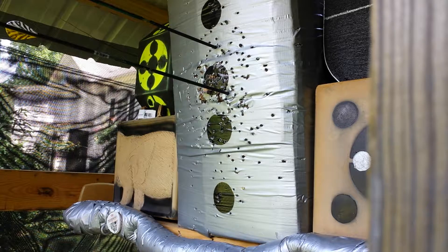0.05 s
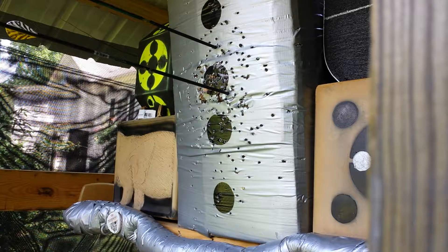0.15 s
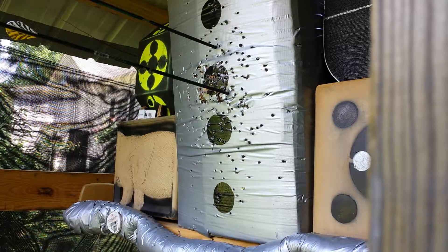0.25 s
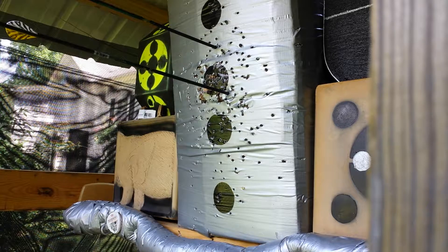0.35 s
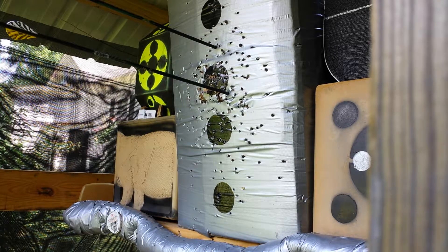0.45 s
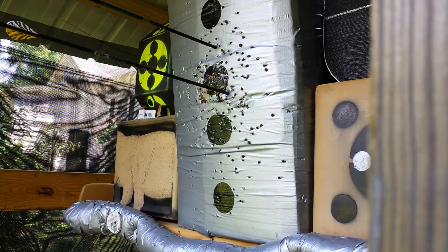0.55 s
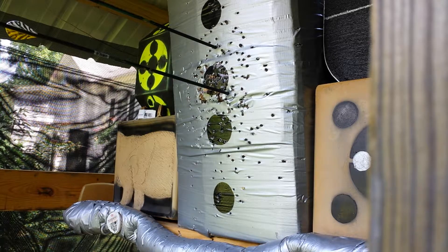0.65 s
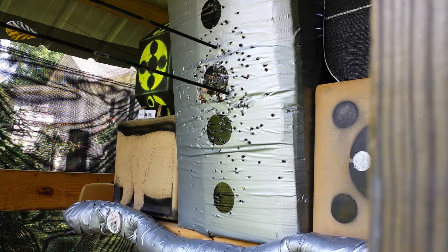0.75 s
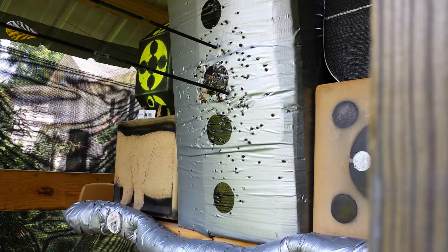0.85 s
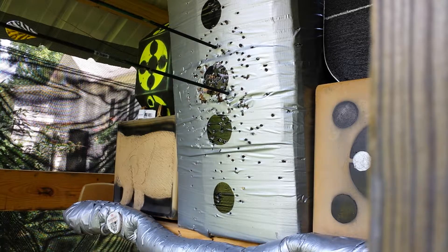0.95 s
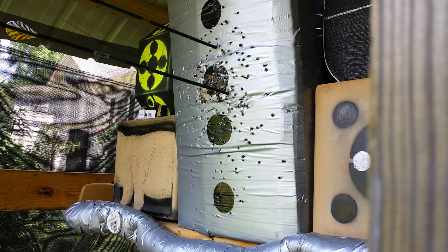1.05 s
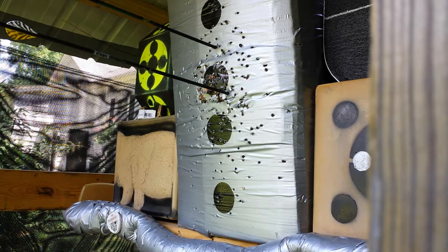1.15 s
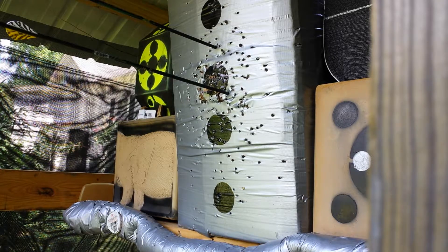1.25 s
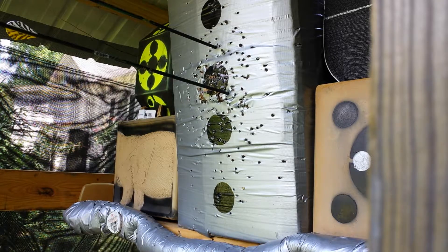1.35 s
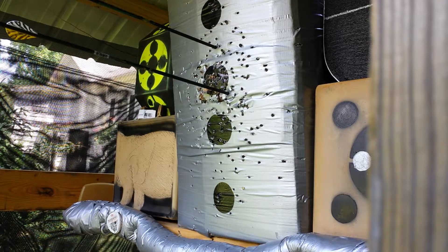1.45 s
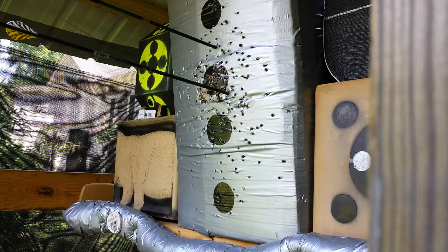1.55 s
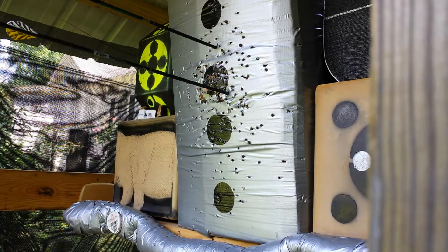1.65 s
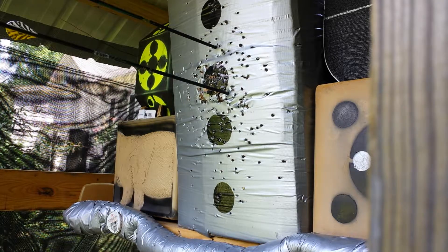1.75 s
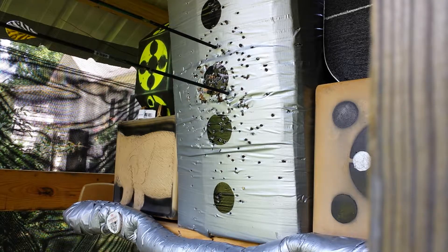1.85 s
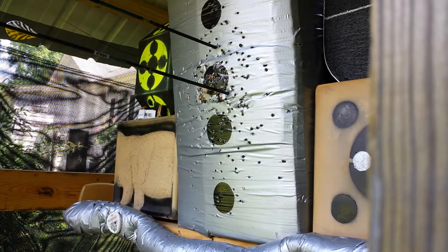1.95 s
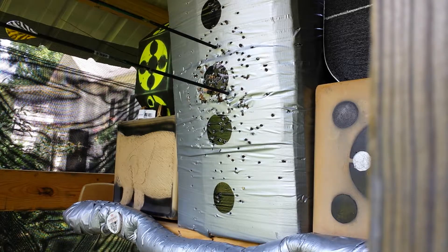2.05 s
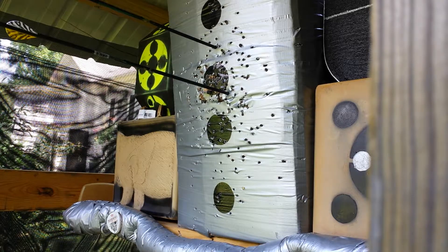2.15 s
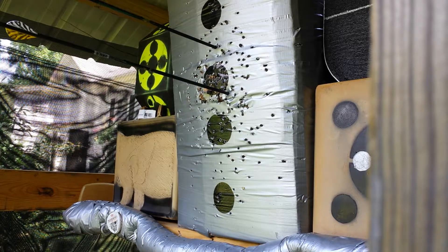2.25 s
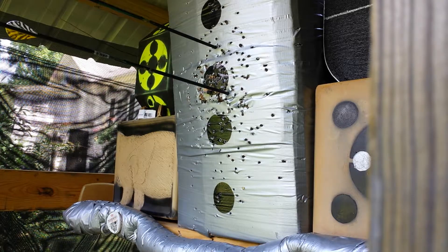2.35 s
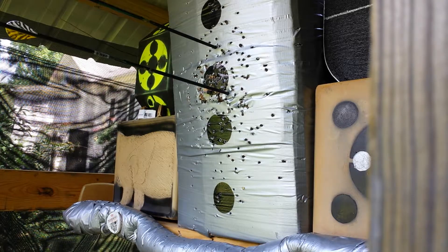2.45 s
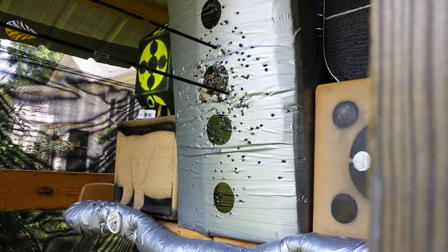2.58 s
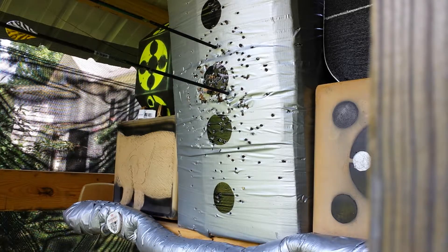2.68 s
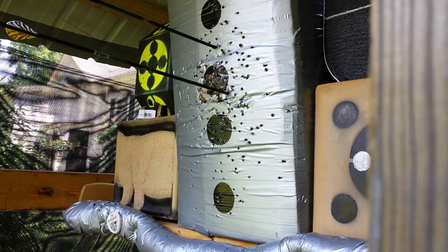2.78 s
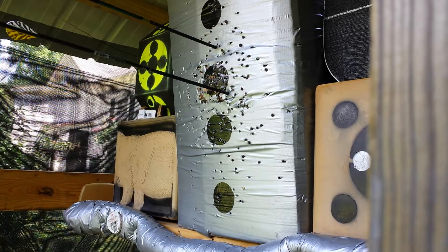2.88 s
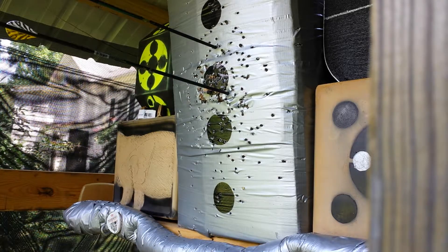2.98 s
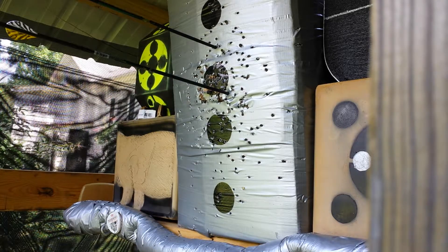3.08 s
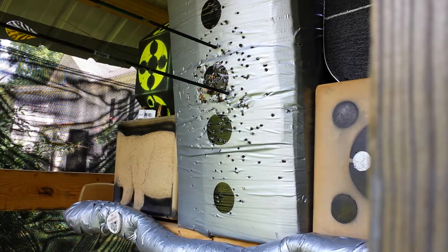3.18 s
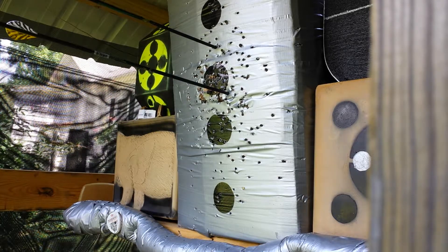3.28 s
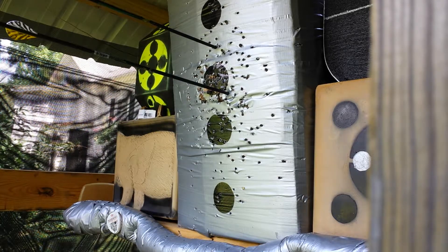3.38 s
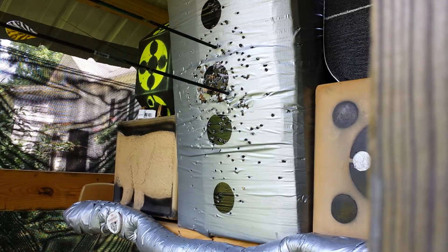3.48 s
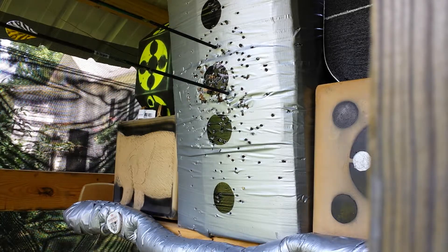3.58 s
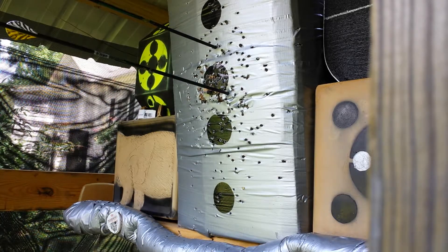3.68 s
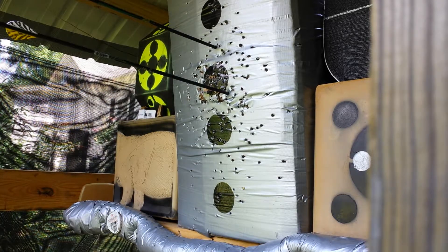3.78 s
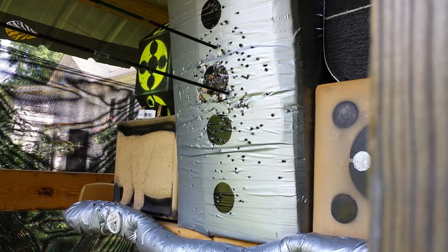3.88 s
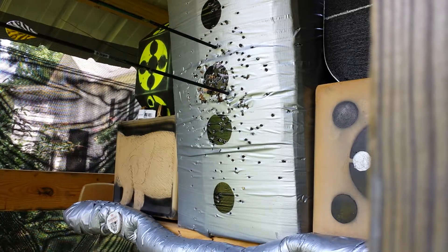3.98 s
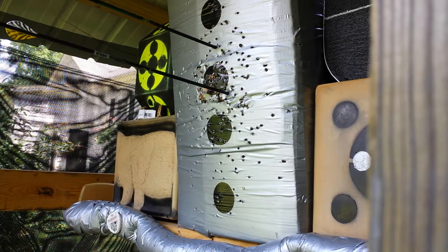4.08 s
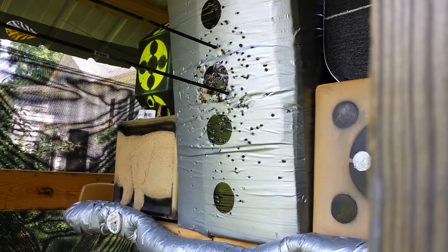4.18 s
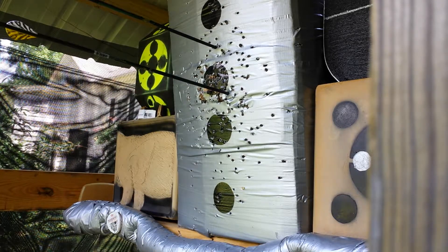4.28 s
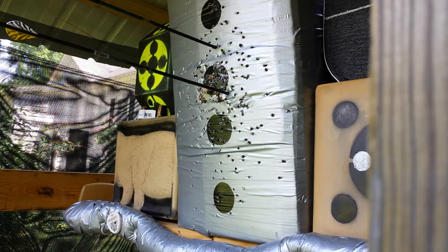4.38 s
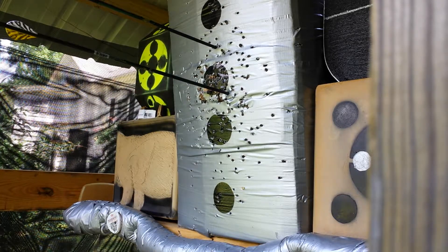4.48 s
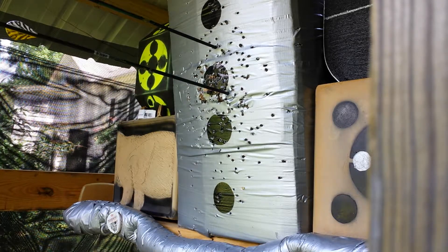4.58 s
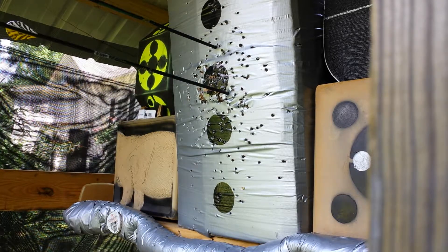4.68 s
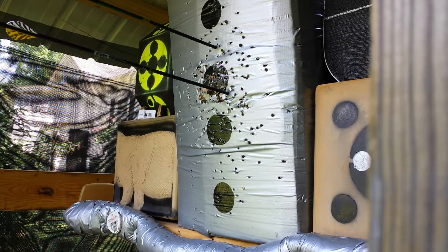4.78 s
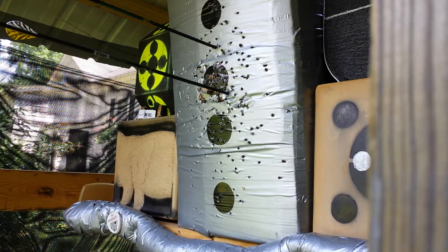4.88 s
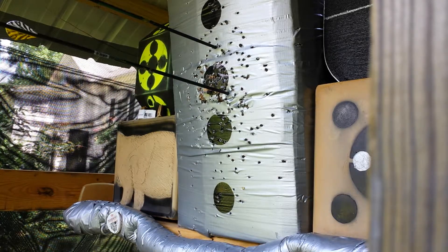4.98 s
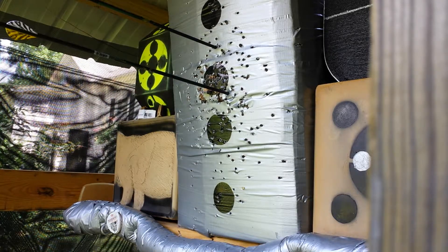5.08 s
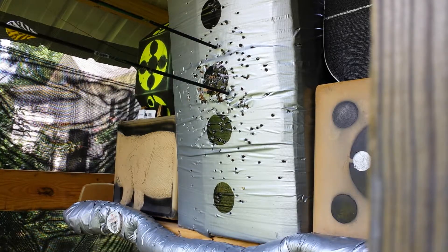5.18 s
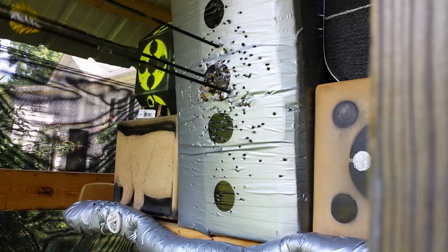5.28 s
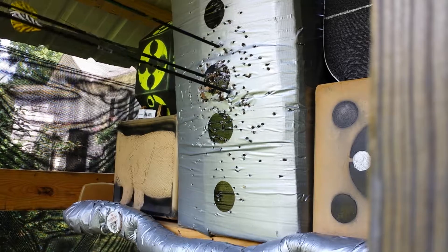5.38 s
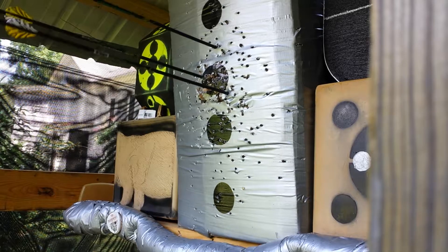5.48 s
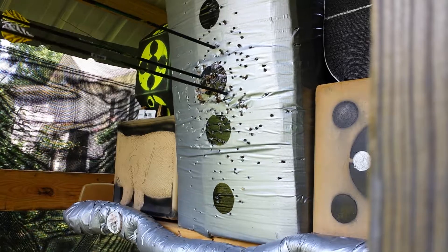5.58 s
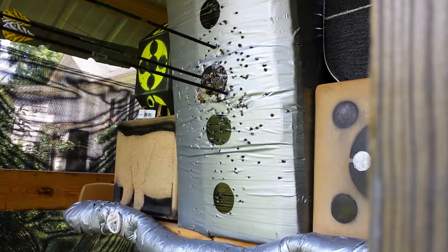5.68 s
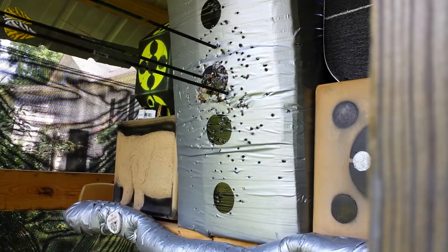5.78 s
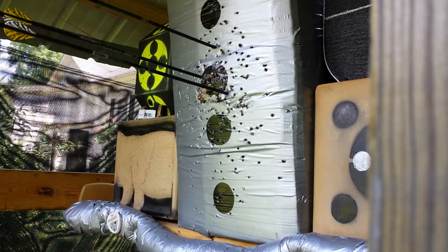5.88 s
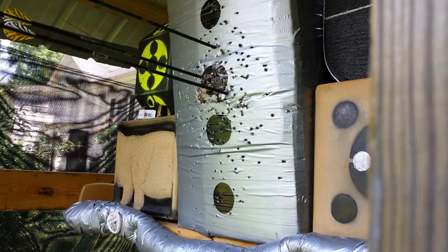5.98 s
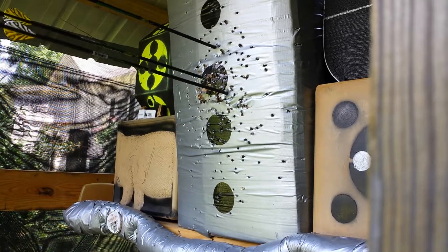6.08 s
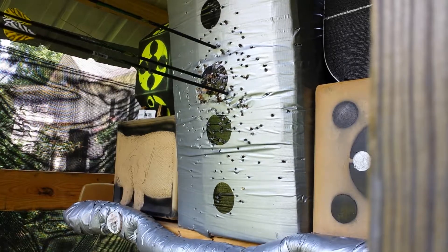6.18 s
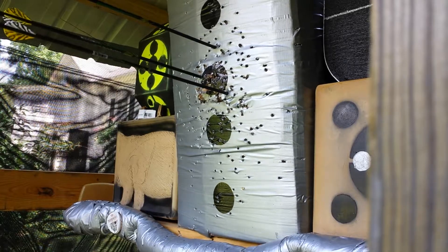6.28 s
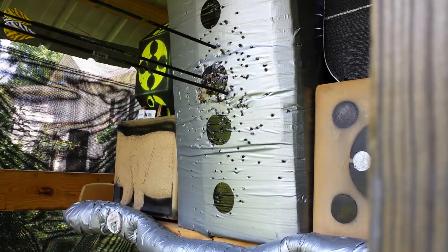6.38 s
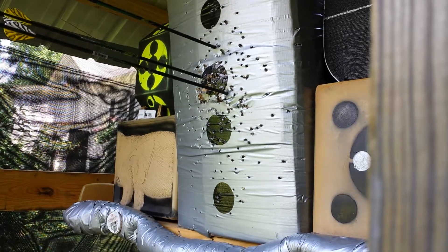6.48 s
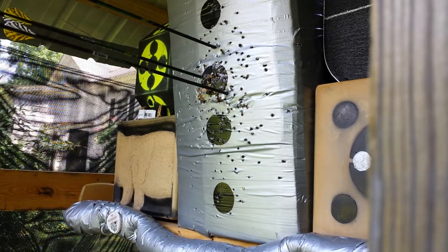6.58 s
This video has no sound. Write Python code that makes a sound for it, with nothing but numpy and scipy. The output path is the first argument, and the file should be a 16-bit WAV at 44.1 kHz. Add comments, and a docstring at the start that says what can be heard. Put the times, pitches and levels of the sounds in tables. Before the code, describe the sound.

After nearly five seconds of leafy insect hiss, a faint bow release is followed by a loud arrow smack, low thud and short echoes.

```python
"""Woods: insect and leaf hiss from the left, gusting rumble and a few gliding bird whistles run behind.
After a light tick a far bow snaps (coloured noise bursts, damped modes); the vanes' noise hisses closer.
The point smacks into a foam block (noise cracks), which thuds (damped sines); close reflections colour it.
Roof ring, trees and boom answer in decaying noise, then a dull thud echo, a far knock and two more ticks.
The camera's gain control ducks everything after the smack, then recovers."""
import sys
import numpy as np
from scipy import signal
from scipy.fft import rfft, irfft, next_fast_len
from scipy.io import wavfile
from scipy.ndimage import minimum_filter1d

SR = 44100
rng = np.random.default_rng(int(sys.argv[2]) if len(sys.argv) > 2 else 0)


def unload_audio(sound):
    """Save the sound as a 16-bit wav file, at the path given as the first command line argument."""
    columns = np.transpose(np.atleast_2d(sound))
    # keep every value between -1 and 1, then stretch to whole-number steps
    steps = np.round(np.clip(columns, -1, 1) * 32767)
    wavfile.write(sys.argv[1], SR, steps.astype(np.int16))


N = 292824
T = np.arange(N) / SR  # scene time [s]
AGE = T[:round(1.25 * SR)]  # time since an event's start [s]
RELEASE_S, HIT_S = 4.8005, 5.2848


def amp(db):
    """Decibels to gain."""
    return 10 ** (np.asarray(db) / 20)


def unit(x):
    """Scales to an rms of one."""
    return x / np.sqrt(np.mean(x ** 2) + 1e-20)


def read(points, hz):
    """Interpolates a table along a log-frequency axis."""
    f, value = np.transpose(points)
    return np.interp(np.log(hz + 1), np.log(f + 1), value)


def pan(side_db):
    """Port gains for a source louder on the left by side_db."""
    return amp(np.array([[.5], [-.5]]) * side_db)


def add(mix, s, sound):
    """Mixes a sound in at time s, in place."""
    part = mix[:, round(s * SR):][:, :sound.shape[-1]]
    part += sound[..., :part.shape[1]]


def low_cut(x, edge_hz):
    """High-pass: keeps deep bass out of a sound."""
    return signal.sosfilt(signal.butter(2, edge_hz, "high", fs=SR, output="sos"), x)


def low_pass(edge_hz):
    """Second-order low-pass sections."""
    return signal.butter(2, edge_hz, fs=SR, output="sos")


def dying(t60_s, rise_s, delay_s=0.):
    """Envelope of a blow: quick rise, exponential fall."""
    age = np.maximum(AGE - delay_s, 0)
    return (1 - np.exp(-age / rise_s)) * np.exp(-np.log(1000) * age / t60_s)


def noise(colour, same=0., lag_ms=0., size=len(AGE)):
    """Unit-rms coloured noise at two microphone ports; the shared part lags by lag_ms on the left."""
    full = next_fast_len(size)
    hz = np.fft.rfftfreq(full, 1 / SR)
    own, shared = rfft(rng.standard_normal((2, full)))
    same = np.clip(read(same, hz) if np.ndim(same) else same, -1, 1)
    lag = np.exp(-2j * np.pi * hz * lag_ms / 1000)
    left = same * shared * lag + np.sqrt(1 - same ** 2) * own
    ports_db = [read(np.array(colour)[:, [0, port]], hz) for port in (1, 2)]
    return unit(irfft(np.array([left, shared]) * amp(ports_db), full)[:, :size])


def drift(top_hz):
    """Slow random wander of unit rms: sines of random phase up to top_hz."""
    coarse = T[::256]
    rates_hz = np.geomspace(top_hz / 20, top_hz, 20)
    slow = sum(np.sin(2 * np.pi * (f * coarse + rng.random())) / np.sqrt(f) for f in rates_hz)
    return np.interp(T, coarse, unit(slow))


def ring(modes, rise_s):
    """Damped sines; each port hears them in a different random phase."""
    out = np.zeros((2, len(AGE)))
    for hz, db, t60_s in modes:
        phase = rng.random((2, 1))
        out += amp(db) * dying(t60_s, rise_s) * np.sin(2 * np.pi * (hz * AGE + phase))
    return out


def rock(modes, rise_s, delay_s):
    """Damped modes that all start from rest."""
    age = AGE - delay_s
    return sum(amp(db) * dying(t60_s, rise_s, delay_s) * np.sin(2 * np.pi * hz * age)
               for hz, db, t60_s in modes)


# colour of the bursting cover: (frequency [Hz], left [relative dB/Hz], right [relative dB/Hz])
SMACK_COLOUR = [(400, -8.5, -10.5), (600, -6.5, -4.5), (850, -9.5, -7.5), (1294, -10, -16),
                (2030, -9, -14.5), (2660, -0.5, 1), (3500, -3.5, -8), (4300, -6, -7), (5400, -3, -5),
                (7700, -11, -7.5), (9000, -25.5, -16), (12500, -28, -22.5), (15000, -26.5, -15.5)]
# first crack and its returns off close surfaces: (delay [s], level [dB], left lag [ms])
SLAPS = [(0, -5.5, .16), (.0022, -5.5, .05), (.0036, -3.5, 0.17), (.006, -11.5, .1), (.0175, -22.5, -.1)]


def smack(crack_db=11.0, crack_t60_s=0.016, crush_db=1, crush_t60_s=0.055):
    """The point bursts the cover, close surfaces repeat the crack, the foam grips the arrow."""
    cracks = sum(amp(db) * noise(SMACK_COLOUR, .9, lag_ms) * dying(crack_t60_s, .00008, delay_s)
                 for delay_s, db, lag_ms in SLAPS)
    crush = noise(SMACK_COLOUR, 0.43, 0.18) * dying(crush_t60_s, 0.0025)
    return low_cut(amp(crack_db) * cracks + amp(crush_db) * crush, edge_hz=440)


# taut face of the block: (frequency [Hz], level [relative dB], t60 [s])
FACE_MODES = [(232, -1.5, 0.045), (615, -5, .04), (988, -7.5, 0.04), (1105, -10, .04)]
# block and stand: (frequency [Hz], level [relative dB], t60 [s])
BLOCK_MODES = [(80, -15.5, .16), (109.7, -9.5, .13), (130.3, -0.5, 0.11), (145.8, -13, 0.14),
               (179.2, -11, 0.12), (210, -13, 0.11), (260, -13, 0.063), (331, -7.5, 0.092),
               (472, -15.5, 0.092), (584, -15.5, .07), (625, -12, 0.063), (767, -19.5, .07),
               (948, -14.5, .06)]


def block(thud_db=3.5, push_s=.0037, rise_s=0.0025, face_db=-1, face_rise_s=.0015, face_s=.0005,
          lowest_hz=52):
    """The face knocks first; the braking arrow then shoves the heavy block, which rocks in low modes."""
    knock = amp(face_db) * rock(FACE_MODES, face_rise_s, face_s)
    thud = amp(thud_db) * rock(BLOCK_MODES, rise_s, push_s)
    return pan(2.2) * low_cut(knock + thud, lowest_hz)


# bright lines in the roof's reflections: (frequency [Hz], level [relative dB], t60 [s])
REFLECTION_LINES = [(2430, -2, 0.11), (2620, -1.5, 0.081), (2790, -4, .07), (3280, 3, .06),
                    (3770, -6, 0.091), (4911, -4, 0.066), (5130, 2.5, .06), (5280, 4, 0.1),
                    (5800, 1.5, .08), (5930, 6, 0.066)]


def reflection_lines(lines_db=-11):
    """Close reflections add short bright tones to the hit, made as damped sines."""
    return amp(lines_db) * pan(3) * ring(REFLECTION_LINES, .0005)


# colours of roof ring, tree echo, rolling thud:
# (frequency [Hz], left [relative dB/Hz], right [relative dB/Hz])
ROOF_COLOUR = [(600, -4.5, -8.5), (1000, -11.5, -10.5), (1586, -11, -15), (2400, -3, -2),
               (3400, -1.5, -4.5), (4300, -5, -7), (5600, -0.5, -6.5), (7440, -10.5, -7.5),
               (9100, -16.5, -18.5), (12520, -26, -17), (15000, -25, -15.5)]
TREES_COLOUR = [(300, 2, -1), (600, -6, -7), (1200, -9.0, -16), (2500, -5.5, -7.5), (4000, -6, -14),
                (5600, -3.5, -12.5), (8500, -18, -16.5), (11500, -27.5, -25), (15000, -28.5, -25)]
BOOM_COLOUR = [(30, -30, -31.5), (80, -7, -11), (125, 0, -3), (170, -6.5, -9), (260, -18.5, -22.5),
               (700, -30.5, -33.5), (3000, -69.5, -69.5)]


def echoes(roof_db=-1.5, roof_t60_s=0.12, trees_db=-27.5, trees_t60_s=0.92, boom_db=-30.0,
           boom_t60_s=1.05, clump_db=1):
    """Dense short ring under the roof, faint long one from trees and ground, and a rolling boom."""
    same = [(150, 1.0), (600, .8), (1500, .1)]  # (frequency [Hz], port likeness [0-1])
    clumps = amp(clump_db * drift(140)[:len(AGE)])  # reflections arrive in bunches
    roof = low_cut(noise(ROOF_COLOUR, same), edge_hz=280) * dying(roof_t60_s, .004) * clumps
    trees = noise(TREES_COLOUR, same) * dying(trees_t60_s, .02) * np.sqrt(clumps)
    boom = noise(BOOM_COLOUR, same) * dying(boom_t60_s, .05)
    return amp(roof_db) * roof + amp(trees_db) * trees + amp(boom_db) * boom


def thud_echo(thud, echo_db=-27, dull_hz=350):
    """The low thud comes back once, low-passed, from something nearby."""
    return amp(echo_db) * signal.sosfilt(low_pass(dull_hz), thud)


# dull far echo: (frequency [Hz], left [relative dB/Hz], right [relative dB/Hz])
FAR_WALL_COLOUR = [(100, -8, -10), (400, -4, -9), (1140, 5, -3), (1800, -19, -18), (5000, -22, -28),
                   (15000, -41, -45)]
# ringing of the far knock: (frequency [Hz], level [relative dB], t60 [s])
FAR_RING_MODES = [(745, 2, 0.43), (1125, 5, 0.22), (1390, -2, .12)]


def far_knock(wall_db=-37, t60_s=0.23, ring_db=-43):
    """The smack returns dull, through the trees, from something large and far: noise plus a few modes."""
    wall = amp(wall_db) * noise(FAR_WALL_COLOUR, 0.67) * dying(t60_s, 0.00093)
    return wall + amp(ring_db) * ring(FAR_RING_MODES, 0.0018)


# string and limbs: (frequency [Hz], left [relative dB/Hz], right [relative dB/Hz])
BOW_COLOUR = [(120, -11, -18), (280, -6, -4), (516, -11, -20), (1100, -1.5, -9), (1750, -5, -8),
              (2300, -4.5, -14), (4000, -3.5, -12), (5800, -10, -10.0), (8500, -29, -12), (13000, -38, -23),
              (15000, -42.5, -25)]
# limbs and cams: (frequency [Hz], level [relative dB], t60 [s])
LIMB_MODES = [(225, -2.5, .25), (1780, 0, .22), (2340, -2, .2)]


def bow(string_db=-44, lead_s=.007, snap_db=-21, buzz_db=-34, buzz_t60_s=.22, limbs_db=-47,
        bounce_db=-33, bounce_s=0.0073, bounce_t60_s=0.046):
    """The string starts forward, snaps taut, and the limbs buzz out; the ground repeats the snap."""
    string = amp(string_db) * noise(BOW_COLOUR, 0.56, 0.4) * dying(0.049, 0.00041)
    envelope = amp(snap_db) * dying(0.0086, 0.00061) + amp(buzz_db) * dying(buzz_t60_s, 0.004)
    snap = noise(BOW_COLOUR, 0.85, .36) * envelope
    bounce = amp(bounce_db) * noise(BOW_COLOUR, .75, .1) * dying(bounce_t60_s, .001, bounce_s)
    limbs = amp(limbs_db) * pan(4.4) * ring(LIMB_MODES, .002)
    out = np.zeros((2, N))
    add(out, RELEASE_S - lead_s, string)
    add(out, RELEASE_S, snap + bounce + limbs)
    return out


# arrow leaving the bow, vanes close by: (frequency [Hz], left [relative dB/Hz], right [relative dB/Hz])
LAUNCH_COLOUR = [(400, -10.5, -11.5), (1200, -7.5, -18), (1795, -6, -10), (2600, -8.5, -16),
                 (4000, -3, -15.5), (5300, 2, -11), (6990, -13, -14.5), (10010, -23.5, -19.5),
                 (15000, -29.5, -30)]
VANES_COLOUR = [(400.6, -20.5, -23.5), (1100, -15.5, -22), (2000, -7, -13.5), (3000, -4, -11.5),
                (4100, -4.5, -10), (5300, 1, -10.5), (6750, -9, -10), (9500, -20, -13.5),
                (15040, -32.5, -15)]


def flight(launch_db=-44, launch_t60_s=1.7, near_db=-38, pass_s=5.255, near_s=0.026, arrive_db=-33,
           arrive_s=.005):
    """The vanes hiss off the bow, swell as one over distance, and flare as they enter the shelter."""
    t = RELEASE_S + AGE
    leaving = amp(launch_db) * dying(launch_t60_s, 0.016)
    flown = (t - RELEASE_S) / (HIT_S - RELEASE_S)
    passing = amp(near_db) * flown / np.hypot(1, (t - pass_s) / near_s)
    arriving = amp(arrive_db) * np.exp(-abs(t - HIT_S) / arrive_s)
    vanes = noise(VANES_COLOUR, 0.36, .3) * (passing + arriving) * (t < HIT_S)
    return noise(LAUNCH_COLOUR, 0.55, -0.35) * leaving + vanes


def tick(db, centre_hz, width_octaves, t60_s=0.017, room_db=-21):
    """A steep, damped noise burst in one bell-shaped band, with a little of the roof behind it."""
    hz = np.geomspace(100, 16000, 60)
    bell_db = -40 * np.log10(1 + (np.log2(hz / centre_hz) / width_octaves) ** 2)
    envelope = dying(t60_s, 0.00034) + amp(room_db) * dying(0.17, .003)
    return amp(db) * pan(5.0) * noise(np.c_[hz, bell_db, bell_db], 0.94, 0.35) * envelope


# far notes: (time [s], length [s], pitch before arch [Hz], glide [octaves], level [dB])
BIRD_NOTES = [(1.138, .042, 2750, -.3, -51), (1.178, .05, 3165, .06, -51.5), (1.255, .065, 2900, .04, -59),
              (1.325, .04, 3700, -.08, -60), (2.98, .055, 2910, -.3, -54), (3.07, .04, 2220, -.06, -59.5),
              (3.145, .055, 3030, .2, -55.5), (4.58, .055, 2780, 0, -58.5), (4.691, .06, 2906, .17, -56.5),
              (6.088, .026, 2740, -.14, -52), (6.118, .046, 2740, 0, -52), (6.266, .046, 2715, .06, -50.5)]


def birds(song_db=0, echo_db=-2, t60_s=.55, warble=.01, arch_octaves=.06):
    """Short whistles that glide, arch and waver in pitch, smeared by the trees."""
    song = np.zeros((2, N))
    for s, length_s, pitch_hz, glide, db in BIRD_NOTES:
        t = AGE[AGE < length_s]
        arch = np.sin(np.pi * t / length_s)
        waver = 1 + warble * np.sin(2 * np.pi * (rng.uniform(40, 90) * t + rng.random()))
        bend_octaves = glide * (t / length_s - .5) + arch_octaves * arch
        hz = pitch_hz * 2 ** bend_octaves * waver
        add(song, s, amp(db) * arch * np.sin(2 * np.pi * np.cumsum(hz) / SR))
    tail = rng.standard_normal((2, len(AGE))) * dying(t60_s, 0.012)
    wet = signal.fftconvolve(song, tail / np.linalg.norm(tail[0]), axes=1)[:, :N]
    return amp(song_db) * pan(3.7) * (song + amp(echo_db) * wet)


# insects, leaves, low rumble: (frequency [Hz], left [relative dB/Hz], right [relative dB/Hz])
WOODS_COLOUR = [(25, -23.5, -26.5), (58.7, -12.0, -15.0), (110, -1.5, -4.5), (178, -11.5, -15.0),
                (340, -16.5, -19.5), (646, -12.5, -17.5), (1110, -17, -25.0), (2000, -19, -25),
                (2700, -18.5, -24.0), (3680, -17.0, -26), (5890, -11.5, -25), (7540, -23, -21.5),
                (11300, -35, -34), (15000, -37.5, -38.5)]
# how alike the ports hear the woods: (frequency [Hz], likeness [0-1])
WOODS_SAME = [(60, .93), (130, 1), (290, 0.96), (640, .55), (1400, 0.41), (3000, .4), (5500, 0.36),
              (9000, 0.05), (15000, 0.17)]
# breeze swells in the rumble: (time of top [s], half length [s], rise [dB])
GUSTS = [(0.6, 0.33, 1.5), (1.58, .38, 3.5), (3.447, 0.12, 4)]
# insect and leaf hiss: (time [s], level [relative dB])
HISS_LEVEL = [(0.2, -0.55), (1.3, 0.8), (2.2, -0.5), (3.15, 0.6), (4.3, -0.74), (5.5, 0.5)]


def woods(air_db=-47, calm_db=-0.85, split_hz=260, lag_ms=-0.39, flutter_db=0.25):
    """Insect and leaf hiss, earlier on the left, over a low rumble that swells with each gust."""
    air = noise(WOODS_COLOUR, WOODS_SAME, lag_ms, size=N)
    low = signal.sosfiltfilt(low_pass(split_hz), air)
    breeze_db = calm_db + sum(db * np.exp(-((T - s) / half_s) ** 2) for s, half_s, db in GUSTS)
    rumble = low * amp(breeze_db + flutter_db * drift(14))
    hiss = (air - low) * amp(np.interp(T, *np.transpose(HISS_LEVEL)))
    return amp(air_db) * (rumble + hiss)


# light ticks about the stand: (time [s], level [dB], centre [Hz], width [octaves])
TICKS = [(2.9134, -43, 6500, 0.62), (5.5662, -23, 2810, .8), (5.6595, -36, 2250, .5)]


def scene(far_knock_s=5.422, thud_echo_s=5.354):
    """The woods, the release, the flight, the hit and what follows it."""
    mix = woods() + birds() + bow()
    thud = block()
    add(mix, RELEASE_S, flight())
    add(mix, HIT_S, smack() + reflection_lines() + thud + echoes())
    add(mix, thud_echo_s, thud_echo(thud))
    add(mix, far_knock_s, far_knock())
    for s, db, centre_hz, width_octaves in TICKS:
        add(mix, s, tick(db, centre_hz, width_octaves))
    return mix


def record(dry, limit_db=-20, range_db=16, hold_s=0.82, recover_db_per_s=29, attack_s=0.0006,
           edge_hz=15700):
    """Gain control drops fast, holds, then recovers; peaks clip; a low-pass limits the band."""
    over_db = np.clip(20 * np.log10(abs(dry).max(0) + 1e-9) - limit_db, 0, None)
    over_db = np.minimum(over_db * (over_db > 6), range_db)  # reacts only beyond 6 dB over
    size = int(hold_s * SR)
    # running maximum over the past hold_s
    held_db = -minimum_filter1d(-over_db, size, origin=(size - 1) // 2, mode="constant")
    fall_db = T * recover_db_per_s
    cut_db = np.maximum.accumulate(held_db + fall_db) - fall_db
    pole = np.exp(-1 / (attack_s * SR))
    ducked = dry / amp(signal.lfilter([1 - pole], [1, -pole], cut_db))
    clipped = np.clip(ducked, -.93, .93)
    band = signal.firwin(511, edge_hz, window=("kaiser", 9), fs=SR)
    return signal.oaconvolve(clipped, band[None], "same")


dry = scene()
out = record(dry)
unload_audio(out)
```